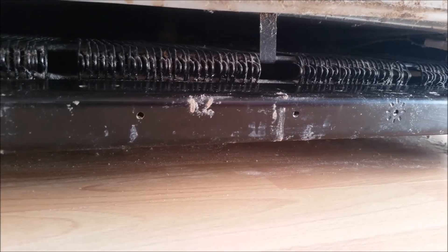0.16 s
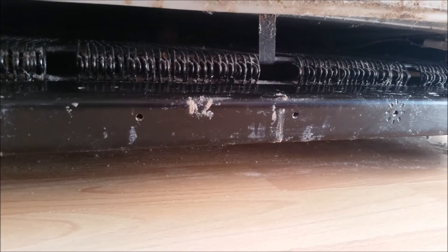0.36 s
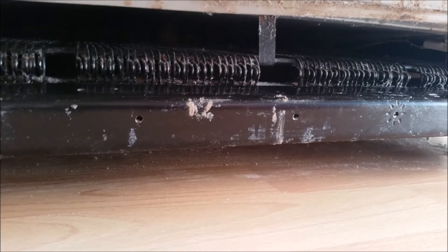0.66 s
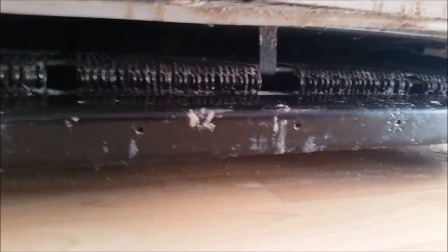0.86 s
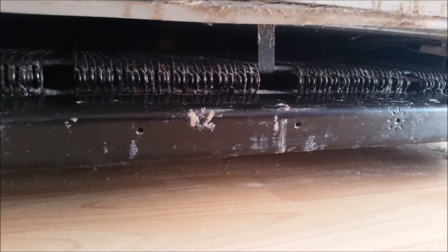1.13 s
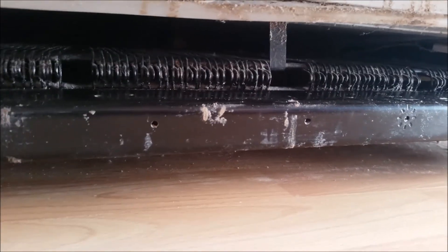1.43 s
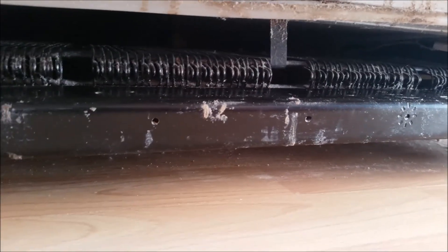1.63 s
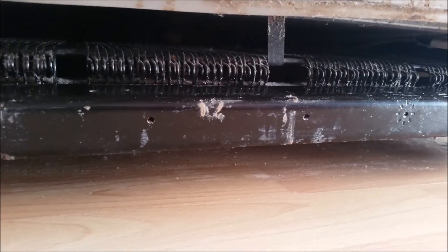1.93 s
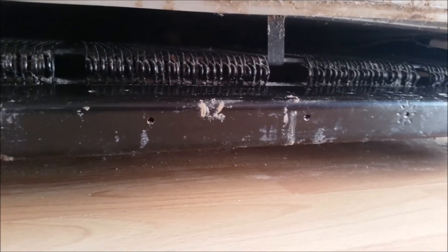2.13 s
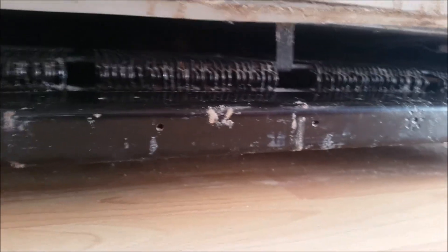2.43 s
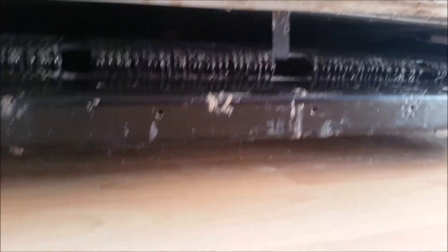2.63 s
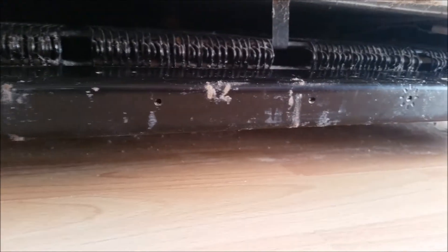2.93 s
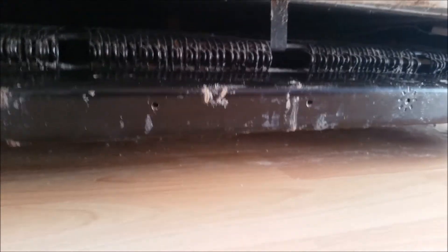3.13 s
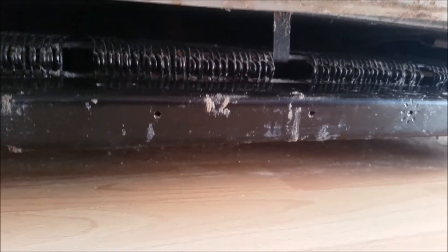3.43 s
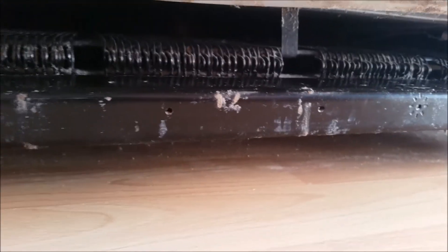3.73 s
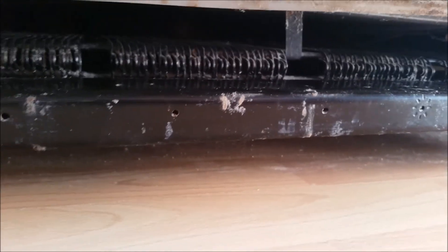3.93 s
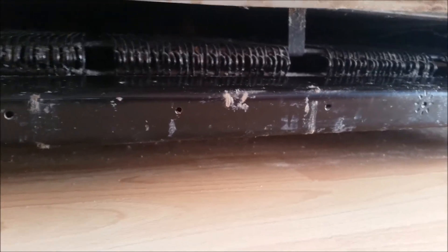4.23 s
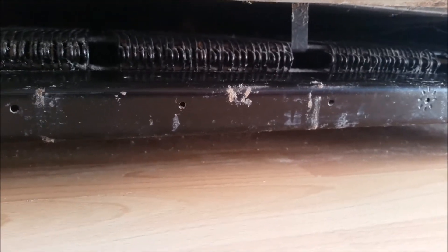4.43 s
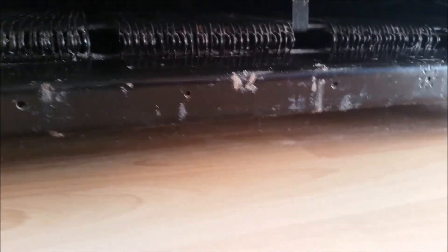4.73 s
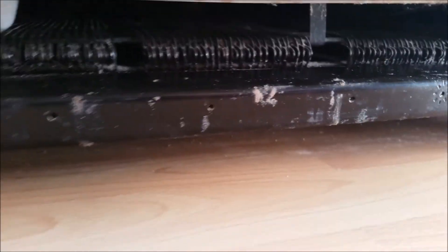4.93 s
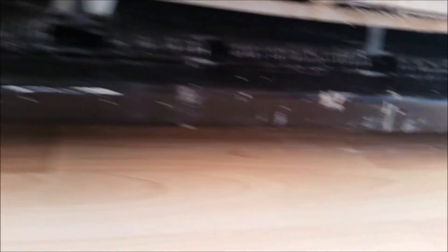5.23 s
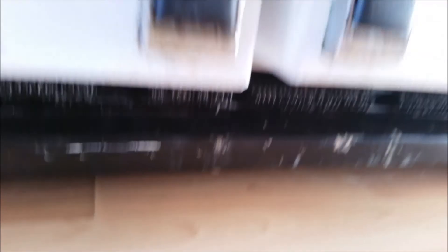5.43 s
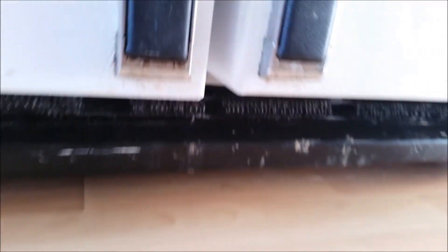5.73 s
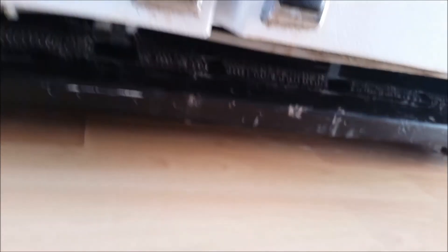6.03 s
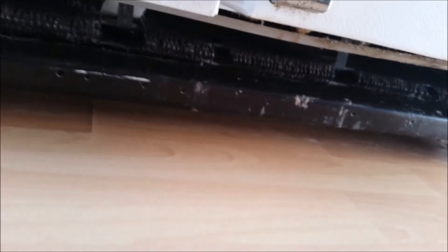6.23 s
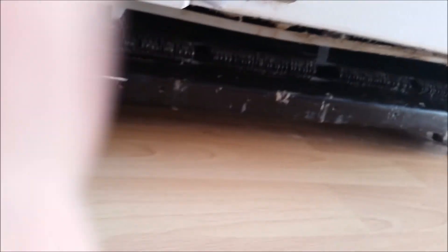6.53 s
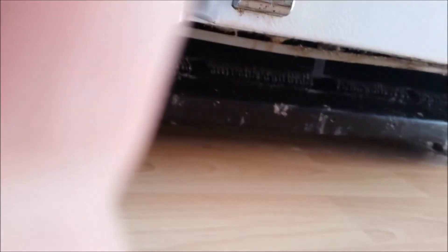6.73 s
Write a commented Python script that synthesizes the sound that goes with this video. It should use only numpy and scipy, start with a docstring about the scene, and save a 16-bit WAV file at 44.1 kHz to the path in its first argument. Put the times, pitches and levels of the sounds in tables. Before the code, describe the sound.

A refrigerator's compressor and fan drone low and steadily from the grille near a kitchen floor, slightly wavering, with soft air rush and faint hiss. A phone held close picks up finger clicks, dull presses and thin swishes. The hum sinks and recovers twice in the first half; at the very end a finger scrapes loudly across the left microphone while the palm brushes the right.

```python
"""Refrigerator, heard on a phone at the grille near the kitchen floor: wavering motor and fan sines beat,
noise resonances drone as the cabinet, and filtered noise makes the rush of air and a thin hiss.
The hand shifts in high swishes of hiss; fingers tap (pressure spikes and case ringing), press (slow
swings) and rub (dense skin slips), at the end sliding across the left port as the palm brushes the right.
The steady background as heard sinks twice and recovers, its rush of air more and its hiss most."""
import sys
import numpy as np
from scipy import signal
from scipy.fft import rfft, irfft, next_fast_len
from scipy.io import wavfile
from scipy.ndimage import uniform_filter1d

SR = 44100
rng = np.random.default_rng(int(sys.argv[2]) if len(sys.argv) > 2 else 0)


def to_wav(sig):
    """Store sig (one row per channel, or 1-D mono) as 16-bit WAV at the path in sys.argv[1].

    Samples outside -1..1 are clipped; the rate is SR.
    """
    pcm = np.clip(np.atleast_2d(sig), -1, 1) * 32767
    pcm = np.round(pcm).astype(np.int16)
    wavfile.write(sys.argv[1], SR, pcm.T)  # frames by channels


N = 302967
TIME_S = np.arange(N) / SR

# Steady tones, before HUM_DB: freq_hz, rms_db, left_minus_right_db
# rows: compressor shaft, faint side tone, fan blades, magnetic pull at twice mains,
# fan octave, compressor 4th order, compressor 5th order, fan 3rd order
MOTOR_TONES = [ (59.26, -43.5, -1), (93, -49, 0), (104.87, -37, -1.5), (119.85, -30.5, 0.5),
               (208.3, -45.5, 3.5), (238.7, -55, -6), (293.6, -51.5, 2.5), (321, -62.5, 6), ]
# Cabinet resonances shaken by air flow, before HUM_DB: centre_hz, width_hz (per filter pass), rms_db
CABINET_MODES = [(182.2, 22.5, -33.5), (135, 141, -40), (230.4, 70, -48.5)]
# Air rush spectrum at each port, before AIR_DB: freq_hz, left_db_per_hz, right_db_per_hz
AIR_SPECTRUM = [(25, -79, -69.5), (59, -64, -60), (136, -72.5, -60), (274, -68, -69.5), (440, -70, -73.5),
                (1010, -76.5, -81.5), (1204, -77, -77), (1590, -85.5, -85.5), (2162, -73.5, -90.5),
                (2817, -95, -97.5), (3006, -75, -91.5), (3930, -80, -93.5), (4664, -104, -104),
                (6860, -136, -136)]
# Top hiss spectrum, before HISS_DB or swish gain: freq_hz, level_db_per_hz
HISS_SPECTRUM = [(2000, -125), (4800, -108), (6700, -113), (8300, -140), (10000, -112), (11500, -101),
                 (15500, -100)]
# Swishes as the hand shifts: start_s, length_s (to fade), hiss_gain_db
SWISHES = [(.85, 0.14, -8), (3.609, 0.18, -10), (3.88, 0.27, -2.5), (4.624, 0.14, 5.5), (4.972, 0.17, -2.5),
           (5.394, .08, -2), (5.58, .33, 7.5), (5.9, 0.33, -1)]
# Finger strokes by the left port: start_s, length_s (to fade), friction_db, pocket_db, pocket_hz
STROKES = [(0.861, 0.086, -45.5, -40, 1360), (3.637, 0.075, -60, -40, 480), (3.73, .07, -53, -44.5, 800),
           (3.85, 0.098, -45.5, -40, 555), (4.655, 0.042, -53, -46, 600), (4.704, 0.057, -44.5, -37.5, 630),
           (6.519, 0.031, -20, -17, 3110), (6.552, 0.036, -28, -50, 3120),
           (6.606, 0.039, -23.5, -36.5, 3050), (6.675, 0.009, -19, -27.5, 3000),
           (6.6883, .014, -34, -21.5, 1750), (6.696, 0.043, -37.5, -40.5, 3250),
           (6.736, 0.15, -29.5, -63, 1370)]
# Finger friction colour, shape only: freq_hz, relative_db
SKIN_COLOUR = [(30, -26.5), (200, 2.5), (450, 4), (900, 0), (1700, -1), (2600, -8.5), (3600, -14),
               (4400, -33.5), (6500, -40.5), (8500, -44.5), (13000, -29), (16000, -36)]
# Finger taps, peak before port colour: start_s, nearer_port, peak_db, time_constant_ms (peak at twice this)
TAPS = [(0.9821, "left", -11.5, 0.12), (1.030, "right", -2.5, 0.039), (1.352, "left", -21.5, 0.18),
        (1.529, "right", -25, 0.063), (2.323, "left", -21, .09), (2.394, "left", -14, 0.17),
        (2.4453, "left", -14.5, .13), (2.4587, "right", -1.5, 0.04), (2.5041, "right", 0.5, 0.07),
        (2.519, "right", -30, 0.043), (2.583, "right", -18, 0.44), (2.6595, "right", -5.5, 0.18),
        (2.748, "left", -15, 0.28), (3.607, "left", -15, 0.09), (3.654, "left", -16.5, 0.11),
        (3.782, "left", -15.5, 0.12), (3.798, "left", -14.5, 0.17), (3.915, "right", -23, .037),
        (4.015, "left", -16.5, 0.17), (4.648, "left", -16, .15), (5.151, "right", -17, 0.36),
        (6.516, "left", -12, 0.053), (6.670, "left", -1.5, 0.12), (6.679, "right", -10.5, 0.042),
        (6.6919, "left", -4.5, 0.043), (6.693, "right", -5, .035), (6.782, "right", -13, 0.3)]
# Port response to a knock: freq_hz, left_db, right_db
KNOCK_RESPONSE = [(30, -23, -16), (130, -7.5, 9.5), (430, 2.5, 2), (940, -2, -2.5), (2240, -2, -2.5),
                  (3800, -10, 3), (5140, -20.5, -9), (8400, -35.5, -28), (11000, -18, -13),
                  (14500, -7.5, 6)]
# Case ringing at the left port: freq_hz, t60_s, relative_db
CASE_MODES = [(1750, 0.0089, -7), (2200, 0.0054, -7), (3200, 0.01, -9.5), (3480, 0.011, -7),
              (5130, .006, -24)]
# Dips of the steady background: start_s, hold_end_after_start_s, depth_db (in the hum; scaled for air, hiss)
DIPS = [(1.08, 0.68, 4.5), (2.379, 0.87, 8)]
# Soft presses, peak before air leak: centre_s, nearer_port, peak_db, centre_to_peak_ms
THUMPS = [(2.400, "left", -14.5, 1.4), (2.471, "right", 1, 1.52), (3.547, "left", -21, 2.7),
          (3.638, "left", -17, 2.1), (4.663, "left", -18, 1.6), (4.836, "right", -19, 2.7),
          (4.950, "right", -15.5, 1.9), (5.154, "right", -18.5, 2.1), (6.7577, "left", -8.5, 0.97),
          (6.795, "left", -11, 2.5)]
# Hand on the right port, briefest ones crack: start_s, length_s (to fade), level_db
BRUSHES = [(6.516, 0.034, -36), (6.62, 0.05, -49), (6.6737, 0.0055, -29.5), (6.6917, 0.0024, -15.5),
           (6.693, 0.049, -37), (6.773, .025, -40), (6.797, .07, -44.5)]
# Brushing colour, shape only: freq_hz, relative_db
PALM_COLOUR = [(100, 6), (500, 7.5), (1300, -3), (3800, -4), (6500, -10.5), (8500, -32), (11000, -18),
               (14500, -3.5), (16000, -10)]

HUM_DB, AIR_DB, HISS_DB = -1.52, -2.3, -10
DIP_FALL_S, DIP_RECOVER_S = 0.56, 0.44
ATTACK_SHARE, FADE_SHARE = 0.3, 0.31  # slide swell and fade constant, shares of its length
POCKET_WIDTH_HZ = 620  # per filter pass
RUMBLE_DB, RUMBLE_LOSS_DB_PER_KHZ = 9.5, 2.5  # strokes with high pockets rumble less
TAP_FAR_DB = -25.5  # at the other port
RING_DB, RING_LOSS_DB_PER_MS = 3.5, 63.5  # longer contacts ring the case less
TOP_HZ = 15900


def undb(db):
    """Decibels to gain."""
    return 10 ** (np.asarray(db) / 20)


def unit(x):
    """Scale to rms 1."""
    return x / np.sqrt(np.mean(x ** 2))


def colour(x, rows, column=1):
    """Minimum-phase filter: the folded cepstrum of a log spectrum gives a causal response."""
    rows = np.array(rows)
    size = 2 * next_fast_len(N // 2 + 2048)
    freq_hz = np.maximum(np.fft.rfftfreq(size, 1 / SR), 1)
    level_db = np.interp(np.log(freq_hz), np.log(rows[:, 0]), rows[:, column])
    cepstrum = irfft(np.log(undb(level_db)))
    cepstrum[1:size // 2] *= 2
    cepstrum[size // 2 + 1:] = 0
    response = np.exp(rfft(cepstrum))
    return irfft(rfft(x, size) * response)[:N]


def resonate(x, centre_hz, width_hz):
    """Two-pole resonance, gain 1 at the centre."""
    b, a = signal.iirpeak(centre_hz, centre_hz / width_hz, fs=SR)
    return signal.lfilter(b, a, x)


def band(x, centre_hz, width_hz):
    """Two resonance passes for steep skirts, at rms 1."""
    once = resonate(x, centre_hz, width_hz)
    return unit(resonate(once, centre_hz, width_hz))


def highpass(x, cutoff_hz, order=2):
    """Butterworth removal of what lies below the cutoff."""
    return signal.sosfilt(signal.butter(order, cutoff_hz, "high", fs=SR, output="sos"), x)


def lowpass(x, cutoff_hz, order):
    """Butterworth removal of what lies above the cutoff."""
    return signal.sosfilt(signal.butter(order, cutoff_hz, fs=SR, output="sos"), x)


def walk(rate_hz):
    """Smooth random wandering, spread near 1."""
    k = int(SR / rate_hz)
    steps = np.repeat(rng.standard_normal(N // k + 1), k)
    smooth = uniform_filter1d(uniform_filter1d(steps, k), k)
    return np.sqrt(2) * smooth[:N]


def noise():
    """White noise at 0 dB per Hz."""
    return rng.standard_normal(N) * np.sqrt(SR / 2)


def slide(start_s, length_s):
    """Envelope of a sliding contact: swell, hold, exponential fade."""
    age = (TIME_S - start_s) / length_s
    swell = np.clip(age / ATTACK_SHARE, 0, 1)
    return swell * np.exp(-np.maximum(age - 1, 0) / FADE_SHARE)


def slips(rate_per_s=9000, spread_db=3.0):
    """Dense tiny skin slips: random impulses of either sign and uneven size."""
    hits = rng.random(N) < rate_per_s / SR
    signs = rng.choice([-1, 1], N)
    size_db = spread_db * np.minimum(rng.exponential(size=N), 4)
    return hits * signs * undb(size_db)


def add(track, start_s, sound):
    """Mix a short sound into a track."""
    i = int(start_s * SR)
    track[i:i + len(sound)] += sound[:N - i]


def port_gains(side, near_db, far_db):
    """Left and right gains of a touch near one port; far_db is relative to the near one."""
    return undb([near_db, near_db + far_db] if side == "left" else [near_db + far_db, near_db])


def motors(waver_db=0.2, phase_wander_rad=0.026):
    """Compressor and fan sines, wandering in phase and level; neighbours beat into a flutter."""
    out = 0
    for freq_hz, rms_db, pan_db in MOTOR_TONES:
        phase = 2 * np.pi * (freq_hz * TIME_S + rng.random()) + phase_wander_rad * walk(2.5)
        tone = np.sqrt(2) * np.sin(phase) * undb(rms_db + waver_db * walk(2.6))
        out = out + tone * undb(np.array([[pan_db], [-pan_db]]) / 2)
    return out


def cabinet():
    """Fan turbulence makes the panels and the gap under them drone, alike at both ports."""
    return sum(undb(rms_db) * band(noise(), hz, width_hz) for hz, width_hz, rms_db in CABINET_MODES)


def air(flicker_db=-1.1):
    """Draught through the grille: flickering noise coloured differently by each port."""
    rush = np.array([colour(noise(), AIR_SPECTRUM, column) for column in (1, 2)])
    return rush * undb(flicker_db * walk(9))


def top_hiss(flicker_db=0.8):
    """Thin high noise, independent at each port, flickering in level."""
    hiss = np.array([colour(noise(), HISS_SPECTRUM) for _ in range(2)])
    return hiss * undb(flicker_db * walk(45))


def swish_gain():
    """The shifting hand swells the hiss."""
    return sum(undb(gain_db) * slide(start_s, length_s) for start_s, length_s, gain_db in SWISHES)


def finger_strokes(rumble_hz=140, rumble_width_hz=260, port_hz=3900):
    """Strokes scrape, rumble as they press and excite the air pocket under the finger."""
    friction = unit(colour(slips(), SKIN_COLOUR))
    rumble = band(slips(), rumble_hz, rumble_width_hz)
    skin = slips(rate_per_s=2500, spread_db=1.5)
    scrape = pocket = 0
    for start_s, length_s, friction_db, pocket_db, pocket_hz in STROKES:
        contact = slide(start_s, length_s)
        rumble_db = RUMBLE_DB - RUMBLE_LOSS_DB_PER_KHZ * pocket_hz / 1000
        scrape = scrape + contact * undb(friction_db) * (friction + undb(rumble_db) * rumble)
        pocket = pocket + contact * undb(pocket_db) * band(skin, pocket_hz, POCKET_WIDTH_HZ)
    return scrape + lowpass(pocket, port_hz, 8)


def taps(left_lag_s=0.00035):
    """Taps are pressure spikes at the ports; short contacts ring the case more."""
    left, right, case = np.zeros((3, N))
    t_s = np.arange(SR // 20) / SR
    for start_s, side, peak_db, time_constant_ms in TAPS:
        age = t_s * 1000 / time_constant_ms
        push = (age / 2) ** 2 * np.exp(2 - age)  # peak 1
        left_gain, right_gain = port_gains(side, peak_db, TAP_FAR_DB)
        add(left, start_s + left_lag_s, left_gain * push)
        add(right, start_s, right_gain * push)
        ring_db = peak_db + RING_DB - RING_LOSS_DB_PER_MS * time_constant_ms
        add(case, start_s + left_lag_s, undb(ring_db) * push / push.sum())
    modes = 0
    for freq_hz, t60_s, level_db in CASE_MODES:
        decay = np.exp(-np.log(1000) * t_s / t60_s)
        modes = modes + undb(level_db) * np.cos(2 * np.pi * freq_hz * t_s) * decay
    # the port passes little above its highest resonances
    ring = lowpass(signal.fftconvolve(case, modes)[:N], 4600, 4)
    return -np.array([colour(left, KNOCK_RESPONSE, 1) + ring, colour(right, KNOCK_RESPONSE, 2)])


def background_dips():
    """Level of the steady background in dB: each dip sinks, holds and recovers."""
    level_db = 0
    for start_s, hold_end_s, depth_db in DIPS:
        age_s = TIME_S - start_s
        sink = np.clip(age_s / DIP_FALL_S, 0, 1)
        recover = np.clip(1 - (age_s - hold_end_s) / DIP_RECOVER_S, 0, 1)
        level_db = level_db - depth_db * sink * recover
    return level_db


def thumps(leak_hz=45, far_db=-22):
    """A fingertip squeezes air into a port and lets go: one slow pressure swing, leaking away."""
    out = np.zeros((2, N))
    t_s = np.arange(-SR // 50, SR // 20) / SR
    for centre_s, side, peak_db, peak_ms in THUMPS:
        age = t_s * 1000 / peak_ms
        swing = highpass(-age * np.exp((1 - age ** 2) / 2), leak_hz, order=1)
        for track, gain in zip(out, port_gains(side, peak_db, far_db)):
            add(track, centre_s + t_s[0], gain * swing)
    return out


def palm_brushes():
    """The hand brushes the right port: coloured skin slips under sliding envelopes."""
    contact = sum(undb(level_db) * slide(start_s, length_s) for start_s, length_s, level_db in BRUSHES)
    return unit(colour(slips(), PALM_COLOUR)) * contact


def rubbing(grip_db=2):
    """Stick and slip under one uneven grip: finger at the left port, palm at the right."""
    return np.array([finger_strokes(), palm_brushes()]) * undb(grip_db * walk(180))


def scene(air_dip=1.35, hiss_dip=2.5):
    """Steady background plus handling; the factors deepen the background dips in air and hiss."""
    dip_db = background_dips()
    hum = (motors() + cabinet()) * undb(HUM_DB + dip_db)
    rush = air() * undb(AIR_DB + air_dip * dip_db)
    # steady hiss and swishes add in power
    top = top_hiss() * np.hypot(undb(HISS_DB + hiss_dip * dip_db), swish_gain())
    return hum + rush + top + taps() + thumps() + rubbing()


def record(dry, ceiling=1.0):
    """The phone drops the deepest rumble, rounds the loudest peaks and cuts the top."""
    x = highpass(dry, 14)
    x = x / (1 + (x / ceiling) ** 8) ** (1 / 8)
    return signal.sosfilt(signal.ellip(8, 0.2, 70, TOP_HZ, fs=SR, output="sos"), x)


dry = scene()
out = record(dry)
to_wav(out)
```